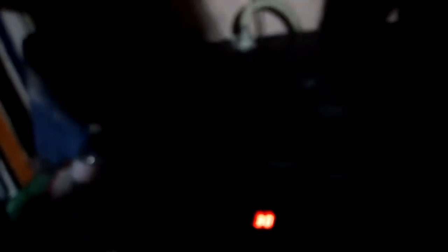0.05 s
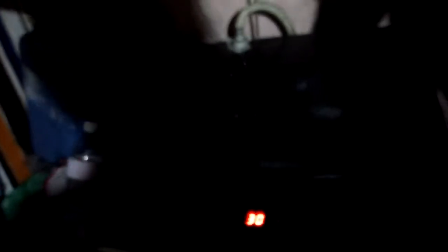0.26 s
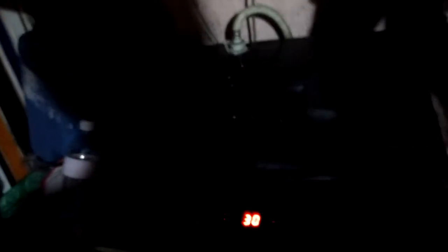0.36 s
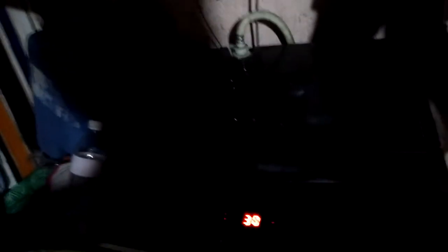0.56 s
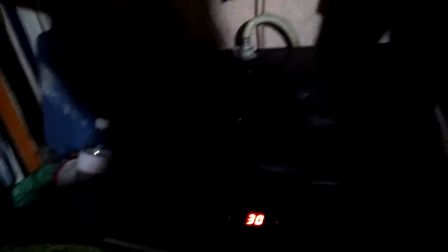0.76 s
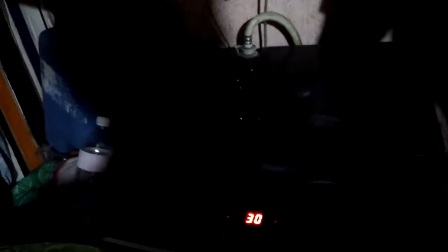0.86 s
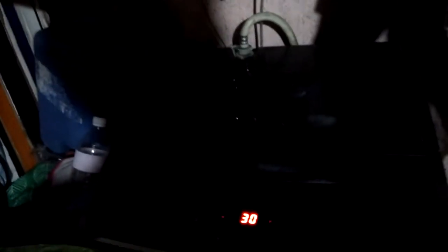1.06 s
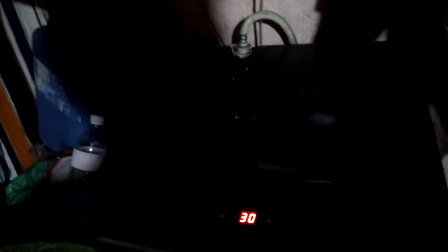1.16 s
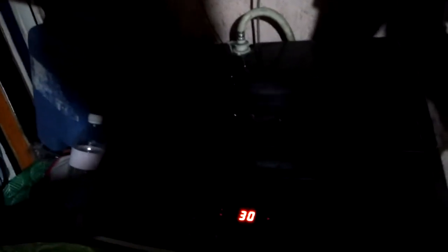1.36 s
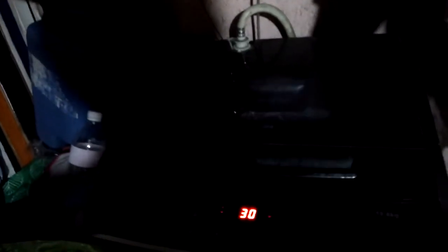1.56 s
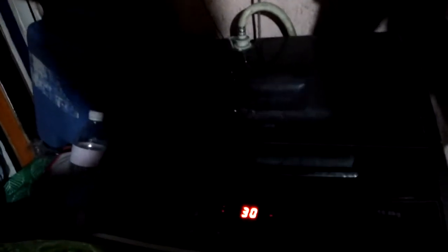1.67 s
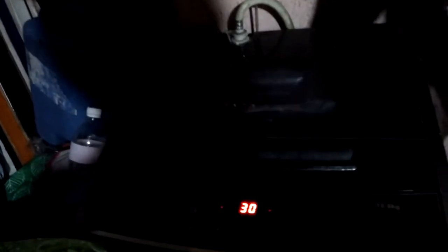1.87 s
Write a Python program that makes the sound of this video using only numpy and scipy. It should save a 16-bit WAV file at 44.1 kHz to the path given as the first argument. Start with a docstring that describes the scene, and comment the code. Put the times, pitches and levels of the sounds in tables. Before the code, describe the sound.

A washing machine knocks off balance in a small room. Its tub thumps heavily at about 0.2 seconds, clacks at 0.4 and rattles the metal panels at 0.7. The pattern repeats with a thump at 1.1, a clack at 1.3 and a rattle near 1.6 seconds. Loose parts tick and the drive rubs between blows, a soft swish passes around 0.9, and the motor hums faintly throughout.

```python
"""A washing machine runs off balance in a small room, one stroke every 0.87 s. Each stroke, the tub thumps the
cabinet, swings back with a clack, then catches and rattles. The blows ring cabinet modes and sheet-metal
panels; the tub wall knocks, the tub rocks on its springs. Each thump cracks at its onset; loose parts tick, one
panel taps, one sings; the drive rubs and hisses between blows. The motor hums underneath. A soft swish passes
once."""
import sys
import numpy as np
from scipy import signal
from scipy.fft import rfft, irfft
from scipy.io import wavfile

SR = 44100
rng = np.random.default_rng(int(sys.argv[2]) if len(sys.argv) > 2 else 0)


def unload_audio(sound):
    """Save the sound as a 16-bit wav file, at the path given as the first command line argument."""
    columns = np.transpose(np.atleast_2d(sound))
    # keep every value between -1 and 1, then stretch to whole-number steps
    steps = np.round(np.clip(columns, -1, 1) * 32767)
    wavfile.write(sys.argv[1], SR, steps.astype(np.int16))


N = 83790
T = np.arange(N) / SR
HZ = np.maximum(np.arange(N // 2 + 1) * SR / N, 1)

# stereo width (frequency [Hz], side over mid [dB])
STEREO_WIDTH = [(2000, -75), (4000, -42), (7000, -6.5), (13000, -5)]
# motor tones, main hum first (frequency [Hz], level [dB])
MOTOR_TONES = [(119, -58), (297, -74.5), (428, -74.5), (588, -77.5), (728, -72), (846, -78), (1098, -81.5),
               (1335, -76), (1400, -76), (2280, -91.5)]
# gain curves (time [s], gain [dB])
OVERTONE_GAIN = [(.12, -3.5), (.2, 5), (.9, 1), (1.1, 1), (1.7, -8), (1.9, -9.5)]
HISS_GAIN = [(0.119, -2), (.23, -11), (.4, 10.5), (.62, -5), (.8, 5), (.96, -18), (1.09, -35), (1.25, 6.5),
             (1.5, -5.5), (1.74, -2), (1.79, -31)]
SWISH_GAIN = [(.75, -41), (.78, -27), (.81, -4), (.852, -21.5), (0.879, -6), (.905, -2.5), (.925, -3),
              (.945, -43)]
# noise spectra (frequency [Hz], density [dB/Hz])
RUNNING_SPECTRUM = [(25, -102), (65, -84), (190, -97.5), (300, -89.5), (480, -100), (780, -95.5),
                    (1050, -103), (1400, -104), (2300, -112), (3200, -123), (6000, -128), (8000, -122),
                    (10000, -128), (14000, -128)]
HISS_SPECTRUM = [(4500, -135), (6500, -122), (7900, -110), (9500, -121), (14000, -125)]
SWISH_SPECTRUM = [(800, -112), (1700, -96.5), (2600, -103), (3800, -98), (6000, -99.5), (8000, -99),
                  (10000, -99.5), (14000, -103)]
RUB_SPECTRUM = [(40, -104), (160, -66.5), (240, -74), (305, -61.5), (420, -85.5), (1500, -91), (2600, -104),
                (4200, -107), (5600, -114), (8000, -111), (10500, -117), (14000, -118)]
SING_SPECTRUM = [(600, -115), (690, -82), (732, -68), (780, -81), (850, -79), (930, -104), (1050, -112),
                 (2000, -150)]
TAP_SPECTRUM = [(300, -93), (900, -81.5), (1500, -69), (1900, -87), (2600, -100), (8000, -120)]
TICK_SPECTRUM = [(300, -88), (1500, -81), (2300, -90), (3150, -91.5), (4100, -103), (6500, -97),
                 (10000, -107), (14000, -99)]
# drive rubbing, panel singing (start [s], end [s], gain [dB])
RUB_SPANS = [(.27, .66, -4.5), (1.14, 1.53, -7)]
SING_SPANS = [(.75, .8, -8), (1.635, 1.715, -0.5)]
# loose-panel taps (time [s], gain [dB])
PANEL_TAPS = [(0.52, -1.5), (.562, -4), (0.62, -5.5), (.786, -8), (1.42, -14)]
# ticks: loose parts, plus the crack at each thump's onset (time [s], gain [dB], ping gain [dB], sizzle [dB])
TICKS = [(0.236, 0.5, -24, 1), (0.367, -24, -3, 0), (0.4173, 2.5, -5.5, -2), (0.5566, 0.5, -2.5, -3),
         (0.615, -6.5, -1, -1), (0.663, -15, 4, 2), (1.109, -1, -27, -2), (1.24, -11, -14, 0),
         (1.2908, 0.5, -2, -1), (1.4312, 2.5, -7.5, -8), (1.4884, -10, -9, -4), (1.5403, -11, -7, -2)]
# tub rocking on its springs (time [s], level [dB])
SPRING_BUMPS = [(0.27, -31), (0.341, -48), (0.45, -36.5), (.505, -33), (0.741, -41), (.845, -45.5),
                (1.147, -28.5), (1.38, -40), (1.611, -55), (1.85, -51.5)]
# tub-wall knocks (time [s], level [dB], frequency [Hz])
WALL_KNOCKS = [(.437, -31.5, 226.3), (.694, -37.5, 285), (1.314, -38, 226), (1.575, -34.5, 283)]
# cabinet modes (frequency [Hz], t60 [s], thump level [dB], clack level [dB], rattle level [dB])
CABINET_MODES = [(55.2, 0.52, -31, -49, -56), (66.1, 0.58, -48, -50, -48), (87.8, 0.33, -32.5, -40.5, -46),
                 (119.7, 0.29, -34, -44, -47), (161, 0.82, -35, -46, -61), (175.4, 0.49, -57, -44.5, -55.5),
                 (212, .35, -47.5, -52, -59), (284.2, 0.22, -43, -41, -40.5), (311, 0.38, -51, -62, -50.5),
                 (327.8, .5, -49.5, -52.5, -53), (422.2, .3, -44.5, -54, -51.5),
                 (440.6, 0.37, -38, -53.5, -38.5), (483, 0.45, -47, -51.5, -56), (578, .4, -44, -44, -44.5),
                 (620, 0.31, -39, -46.5, -50), (745, 0.24, -45, -54, -50), (802, 0.3, -47.5, -63, -49.5),
                 (842.4, 0.64, -54.5, -54.5, -49), (986, 0.25, -41.5, -45.5, -53.5),
                 (1027, 0.18, -43.5, -46.5, -67), (1204, 0.25, -39.5, -51.5, -47),
                 (1222, 0.22, -43, -48, -54), (1389, 0.11, -29.5, -45, -53), (1584, 0.14, -39, -62, -67),
                 (1730, 0.41, -76, -50.5, -54.5), (1830, 0.17, -46, -81, -44.5),
                 (1870, 0.19, -52, -59, -46.5), (2153, 0.076, -62, -70, -49), (2378, 0.15, -50.5, -63, -76)]
# panel decay (frequency [Hz], base t60 [s])
PANEL_DECAY = [(60, 0.17), (250, 0.38), (700, 0.48), (1500, 0.24), (3500, 0.2), (9000, 0.18), (14000, 0.2)]
# dense panel ringing per blow (frequency [Hz], density [dB/Hz])
THUMP_SPECTRUM = [(30, -77), (60, -67), (200, -69), (500, -66), (800, -72), (1000, -70), (1500, -66.5),
                  (2100, -77.5), (2800, -92.5), (4800, -92), (5800, -99), (9000, -99), (14000, -105)]
CLACK_SPECTRUM = [(30, -80), (80, -83), (250, -63), (500, -74), (800, -76.5), (1200, -66.5), (1900, -74),
                  (2700, -87.5), (5000, -88), (9000, -95), (14000, -102)]
CATCH_SPECTRUM = [(60, -79), (280, -69.5), (500, -72), (1100, -73.5), (1500, -91), (2300, -101.5),
                  (3200, -100), (7000, -110), (14000, -114)]
RATTLE_SPECTRUM = [(30, -75), (170, -90), (290, -61), (500, -74), (850, -71.5), (1400, -73.5), (2000, -76),
                   (3200, -85.5), (5500, -90), (8500, -92), (12000, -100), (14000, -101)]
# tub blows (time [s], gain [dB], upper-panel clatter [dB], sizzle [dB])
TUB_THUMPS = [(.238, -1.5, 0.5, -1.5), (1.113, -1, -0.5, -3.5)]
TUB_CLACKS = [(.428, -1.54, 1, -1), (1.303, -0.29, -3.1, -4)]
TUB_CATCHES = [(.661, -2.2, 13, 4), (1.537, -2.2, -1, -1)]
TUB_RATTLES = [(.692, -0.48, 2, 0), (1.567, -0.71, -2.9, -8.5)]


def from_db(db):
    """Decibels to gain."""
    return 10 ** (np.asarray(db) / 20)


def at_hz(table, hz):
    """Table lookup, log-frequency axis."""
    table_hz, values = np.transpose(table)
    return np.interp(np.log(hz), np.log(table_hz), values)


def over_time(table):
    """Table as a curve over time."""
    return np.interp(T, *np.transpose(table))


def sine(hz):
    """Unit sine."""
    return np.sin(2 * np.pi * hz * T)


def drift(rate_hz):
    """Slow random curve, unit spread."""
    slow = irfft(rfft(rng.standard_normal(N)) / (1 + (HZ / rate_hz) ** 2), N)
    return slow / slow.std()


def envelope(attack_s, hold_s, t60_s):
    """Rise, hold during contact, ring out."""
    rise = np.minimum(T / max(attack_s, 1e-4), 1)
    return rise * from_db(-60 * np.maximum(T - attack_s - hold_s, 0) / t60_s)


def swells(spans, rise_s, fall_s):
    """Gain per span: linear rise, hold, exponential fall."""
    return sum(from_db(db) * np.clip((T - start_s) / rise_s, 0, 1)
               * np.exp(-np.maximum(T - end_s, 0) / fall_s) for start_s, end_s, db in spans)


def place(sound, time_s, gain_db):
    """Delay and scale a sound."""
    start = int(np.clip(time_s * SR, 0, N - 1))
    return from_db(gain_db) * np.pad(np.atleast_2d(sound), ((0, 0), (start, 0)))[:, :N]


def room_noise(spectrum, notch_hz=366, notch_width_hz=24.4, notch_db=-17):
    """Stereo noise, wider in the treble, notched by a room cancellation."""
    mid, side = rfft(rng.standard_normal((2, N)))
    stereo = mid + side * from_db(at_hz(STEREO_WIDTH, HZ)) * [[1], [-1]]
    room_db = notch_db * np.exp(-((HZ - notch_hz) / notch_width_hz) ** 2)
    return irfft(stereo * from_db(at_hz(spectrum, HZ) + room_db) * np.sqrt(SR / 2), N)


def brighten(sound, clatter_db, sizzle_db, clatter_hz=1630, width_octaves=0.47, sizzle_hz=10050):
    """Bell on the upper panel ringing, shelf on the top treble."""
    bell = np.exp(-(np.log2(HZ / clatter_hz) / width_octaves) ** 2)
    shelf = 1 / (1 + (sizzle_hz / HZ) ** 10)
    return irfft(rfft(sound) * from_db(clatter_db * bell + sizzle_db * shelf), N)


def motor(hum_waver_db=2.2, overtone_waver_db=5.0, pitch_wander=0.00676):
    """Firm hum and wavering overtones over steady running noise."""
    out = room_noise(RUNNING_SPECTRUM)
    overtone_db = over_time(OVERTONE_GAIN)
    for k, (hz, db) in enumerate(MOTOR_TONES):
        phase = 2 * np.pi * hz * (T + pitch_wander * np.cumsum(drift(27.5)) / SR)
        swing_db = overtone_db + overtone_waver_db * drift(22) if k else hum_waver_db * drift(12)
        out = out + np.sqrt(2) * from_db(db + swing_db) * np.sin(phase)
    return out


def drive_hiss():
    """Thin hiss while the drive pulls."""
    return room_noise(HISS_SPECTRUM) * from_db(over_time(HISS_GAIN))


def swish():
    """One soft pass of bright noise."""
    return room_noise(SWISH_SPECTRUM) * from_db(over_time(SWISH_GAIN))


def drive_rub():
    """Sliding friction in the drive while the tub swings."""
    return room_noise(RUB_SPECTRUM) * swells(RUB_SPANS, rise_s=0.059, fall_s=0.021)


def panel_sing():
    """A panel sings on in a narrow band after each rattle."""
    return room_noise(SING_SPECTRUM) * swells(SING_SPANS, rise_s=0.03, fall_s=0.017)


def panel_taps():
    """A loose panel taps lightly between blows."""
    shape = envelope(attack_s=0.0012, hold_s=0, t60_s=0.07)
    return sum(place(room_noise(TAP_SPECTRUM) * shape, time_s, db) for time_s, db in PANEL_TAPS)


def ticks(ping_hz=3110):
    """Ticks: sharp contact, short room tail, a ping; mostly loose parts, also each thump's crack."""
    contact = envelope(attack_s=0.00071, hold_s=0.00072, t60_s=0.034)
    room_tail = from_db(-10.5) * envelope(attack_s=0.015, hold_s=0, t60_s=0.081)
    ping = from_db(-45) * envelope(attack_s=0.00046, hold_s=0, t60_s=0.014) * sine(ping_hz)
    out = 0
    for time_s, db, ping_db, sizzle_db in TICKS:
        burst = room_noise(TICK_SPECTRUM) * (contact + room_tail)
        tick = brighten(burst, 0, sizzle_db) + from_db(ping_db) * ping
        out = out + place(tick, time_s, db)
    return out


def spring_bumps():
    """The tub rocks on its springs after a blow: damped bass pushes."""
    push = envelope(attack_s=0.008, hold_s=0, t60_s=0.062) * sine(hz=80)
    return sum(place(push, time_s, db) for time_s, db in SPRING_BUMPS)


def wall_knocks():
    """Hollow note of the tub wall in each clack and rattle."""
    shape = envelope(attack_s=0.0055, hold_s=0.003, t60_s=0.067)
    return sum(place(shape * sine(hz), time_s, db) for time_s, db, hz in WALL_KNOCKS)


def cabinet(blow, base_attack_s, attack_cycles):
    """Cabinet modes under one kind of blow; low modes build up slowly."""
    column = ("thump", "clack", "rattle").index(blow)
    out = 0
    for k, (hz, t60_s, *levels_db) in enumerate(CABINET_MODES):
        shape = envelope(base_attack_s + attack_cycles / hz, 0, t60_s)
        out = out + (-1) ** k * from_db(levels_db[column]) * shape * sine(hz)
    return out


def panels(spectrum, attack_s, hold_s, t60_scale, chatter_db):
    """Dense sheet-metal modes, decaying by band, roughened by contact chatter."""
    bins = rfft(room_noise(spectrum))
    edges_hz = np.geomspace(20, 20000, 11)
    out = 0
    for low_hz, high_hz in zip(edges_hz, edges_hz[1:]):
        band = irfft(bins * (HZ >= low_hz) * (HZ < high_hz), N)
        t60_s = t60_scale * at_hz(PANEL_DECAY, np.sqrt(low_hz * high_hz))
        out = out + band * envelope(attack_s, hold_s, t60_s)
    chatter = from_db(chatter_db * drift(110))
    return out * chatter / np.sqrt(np.mean(chatter ** 2))


def blows(events, spectrum, repeat_share, modes=0, **panel_settings):
    """Same contact each stroke: part of the panel ringing repeats, part is new."""
    repeated = np.sqrt(repeat_share) * panels(spectrum, **panel_settings)
    out = 0
    for time_s, db, clatter_db, sizzle_db in events:
        fresh = np.sqrt(1 - repeat_share) * panels(spectrum, **panel_settings)
        blow = brighten(modes + repeated + fresh, clatter_db, sizzle_db)
        out = out + place(blow, time_s, db)
    return out


def tub():
    """The unbalanced tub strikes the cabinet: thump, clack, catch, rattle."""
    thumps = blows(TUB_THUMPS, THUMP_SPECTRUM, repeat_share=0.94,
                   modes=cabinet("thump", base_attack_s=0.017, attack_cycles=0.67),
                   attack_s=0.004, hold_s=0.016, t60_scale=1.37, chatter_db=0.5)
    clacks = blows(TUB_CLACKS, CLACK_SPECTRUM, repeat_share=0.77,
                   modes=cabinet("clack", base_attack_s=0.0101, attack_cycles=1.44),
                   attack_s=0.01, hold_s=0.0088, t60_scale=1.22, chatter_db=1.64)
    catches = blows(TUB_CATCHES, CATCH_SPECTRUM, repeat_share=0.94,
                    attack_s=0.006, hold_s=0.0053, t60_scale=1.0, chatter_db=0.0)
    rattles = blows(TUB_RATTLES, RATTLE_SPECTRUM, repeat_share=0.53,
                    modes=cabinet("rattle", base_attack_s=0.0023, attack_cycles=2.0),
                    attack_s=0.0077, hold_s=0.024, t60_scale=1.0, chatter_db=1.0)
    return thumps + clacks + catches + rattles


def scene():
    """The whole machine, stereo."""
    impacts = tub() + wall_knocks() + spring_bumps() + ticks() + panel_taps()
    return impacts + motor() + drive_rub() + panel_sing() + drive_hiss() + swish()


def record(dry, low_cut_hz=49, start_s=0.12, high_cut_hz=14450):
    """Small-microphone bass loss, silent lead-in, steep top cut."""
    thin = signal.sosfilt(signal.butter(2, low_cut_hz, "high", fs=SR, output="sos"), dry)
    fade_in = np.clip((T - start_s) / 0.0034, 0, 1)
    top_cut = np.clip((high_cut_hz - HZ) / 150 + 0.5, 0, 1)
    return irfft(rfft(thin * fade_in) * top_cut, N)


dry = scene()
out = record(dry)
unload_audio(out)
```